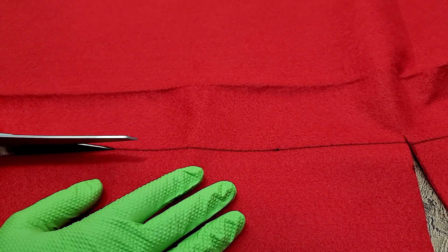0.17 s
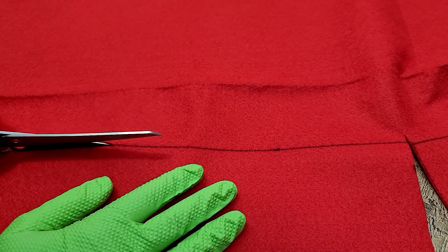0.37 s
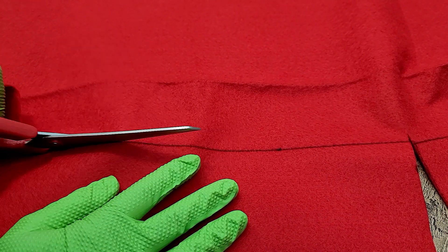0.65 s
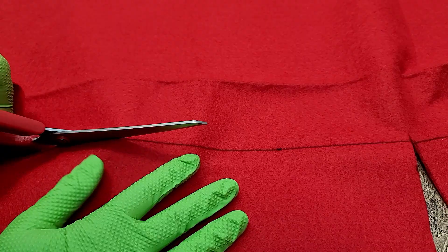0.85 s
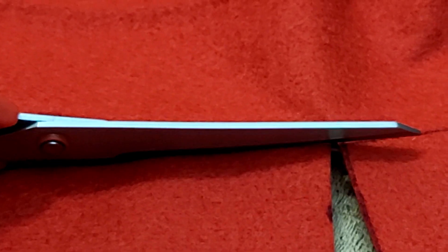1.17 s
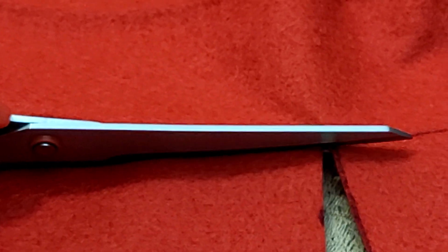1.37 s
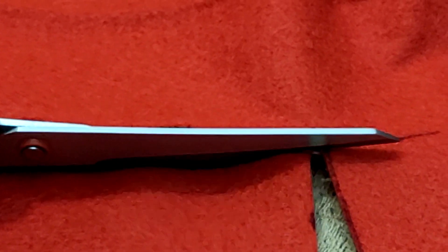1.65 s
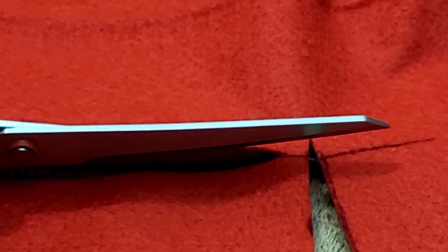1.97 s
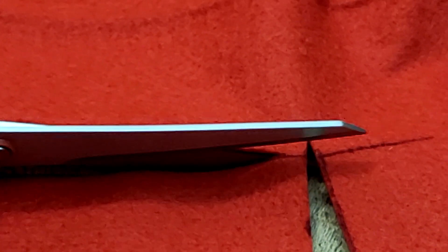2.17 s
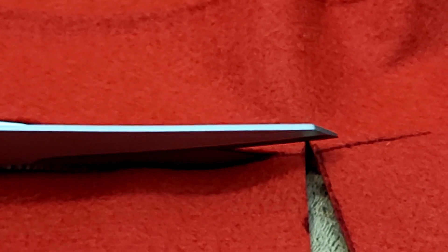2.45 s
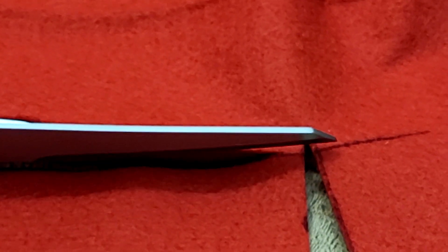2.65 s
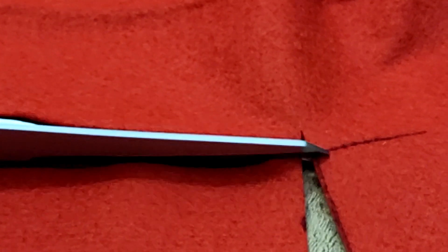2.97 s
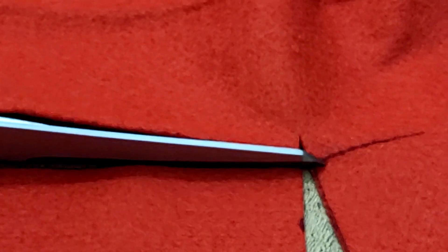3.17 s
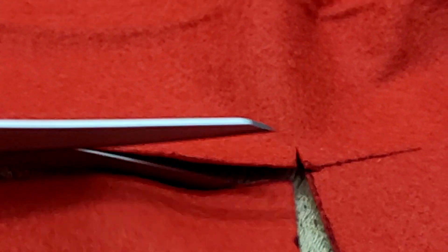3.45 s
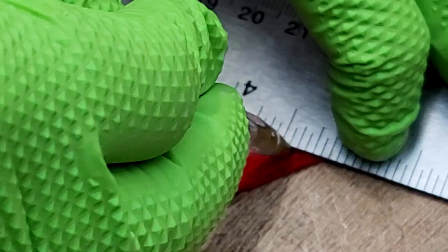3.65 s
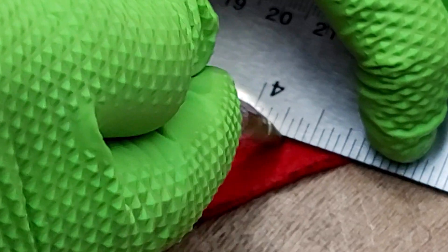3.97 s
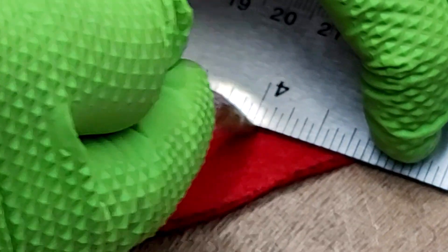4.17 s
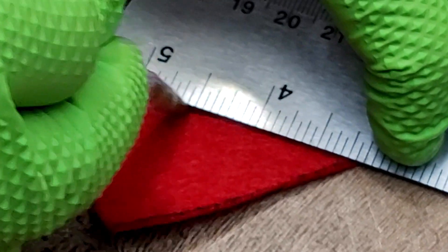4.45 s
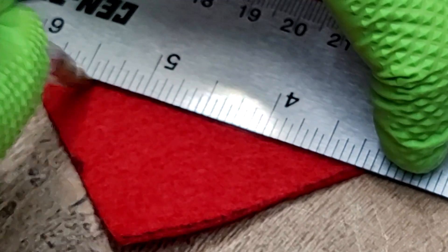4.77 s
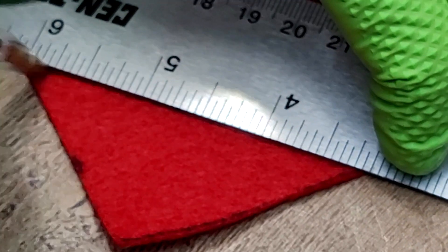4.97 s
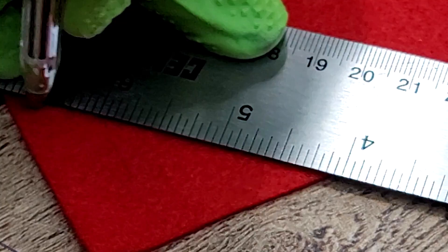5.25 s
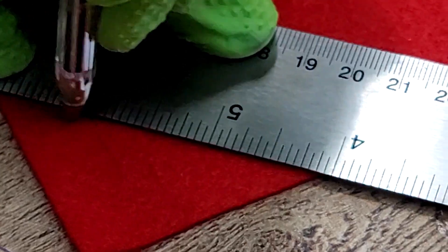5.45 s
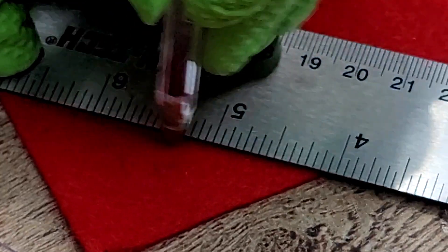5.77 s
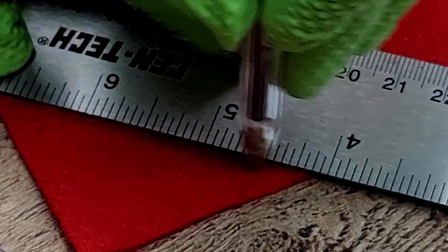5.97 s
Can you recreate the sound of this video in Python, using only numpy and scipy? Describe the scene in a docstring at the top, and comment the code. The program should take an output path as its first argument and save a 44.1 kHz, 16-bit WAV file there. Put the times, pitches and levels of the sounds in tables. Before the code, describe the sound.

Sparse fabric crunches build to a sharp metallic scissor snap in a reverberant workshop, followed by light pen scrapes and a knock on a metal ruler.

```python
"""Over a faint hiss, long shears slide forward under felt on a workbench: filtered noise judders, the blade bumps.
Fibres crunch in bursts of tiny breaks over a soft rustle and hiss, the tips snap shut with a ring, and the
blades release and rasp open again as cut felt slides off. Then a pen is set against a steel ruler, scratches
a line of friction noise and small catches, skims lightly, knocks down on the ruler and draws a second line.
Resonant filters give each part its material; early echoes and a ringing workshop surround the work."""
import sys
import numpy as np
from scipy import signal
from scipy.fft import rfft, irfft
from scipy.io import wavfile
from scipy.ndimage import uniform_filter1d

SR = 44100
rng = np.random.default_rng(int(sys.argv[2]) if len(sys.argv) > 2 else 0)


def file_out(sig):
    """Save sig as 16-bit WAV at sys.argv[1]."""
    # one column per channel
    cols = np.atleast_2d(sig).T
    # limit, then scale
    lim = np.clip(cols, -1, 1)
    pcm = np.round(lim * 32767).astype(np.int16)
    wavfile.write(sys.argv[1], SR, pcm)


N = 269892
TIME = np.arange(N) / SR  # seconds
SIZE = 2 ** 14  # samples in a short sound or a filter response
FREQ = np.fft.rfftfreq(SIZE, 1 / SR)  # Hz
LEAD = SR // 40  # samples of grazing before a blow lands


def amp(db):
    """Turn decibels into gain."""
    return 10 ** (np.asarray(db) / 20)


def at(points, hz):
    """Read a table of (Hz, value) on a log-frequency axis."""
    f, value = np.transpose(points)
    return np.interp(np.log(np.maximum(hz, 1)), np.log(f), value)


def butter(x, hz, kind, order=2):
    """Plain high-pass or low-pass filter."""
    sos = signal.butter(order, min(hz, SR / 2 - 1), kind, fs=SR, output="sos")
    return signal.sosfilt(sos, x + 1e-18)


def body(broad, modes=(), broad_db=0):
    """How an object answers a tap: resonances standing on a broad colour, scaled to unit energy."""
    power = amp(at(broad, FREQ) + broad_db) ** 2
    for hz, width, db in modes:
        detune = (FREQ - hz) / (width / 2)
        power = power + amp(db) ** 2 / (1 + detune ** 2) / (1 + (detune / 6) ** 2)
    # fold the cepstrum so that the response starts at once and never rings before the tap
    cepstrum = irfft(np.log(power) / 2)
    cepstrum[1:SIZE // 2] *= 2
    cepstrum[SIZE // 2 + 1:] = 0
    response = irfft(np.exp(rfft(cepstrum)))
    return response / np.linalg.norm(response)


def through(x, response):
    """Let a force ring a body."""
    return signal.fftconvolve(x, response)[:N]


def add(track, s, sound):
    """Mix a short sound in at s seconds."""
    start = int(s * SR)
    track[start:start + len(sound)] += sound[:N - start]


def split(rows, s):
    """The events before and after a moment."""
    before = [row for row in rows if row[0] < s]
    after = [row for row in rows if row[0] >= s]
    return before, after


def walk(rate):
    """Smooth chance that changes about rate times a second; spread near 1."""
    step = int(SR / rate)
    held = np.repeat(rng.standard_normal(N // step + 1), step)[:N]
    return 1.2 * uniform_filter1d(held, step)


def grains(rate, spread_db):
    """Tiny slips and fibre breaks of very unequal size, over a smooth hiss; rms near 1."""
    chance = rng.random(N) < rate / SR
    size_db = spread_db * np.minimum(rng.exponential(size=N), 4)
    slips = chance * rng.standard_normal(N) * amp(size_db)
    hiss = rng.standard_normal(N) / 2
    return (slips / np.std(slips) + hiss) / np.sqrt(1 + 1 / 4)


def stroke(start, hardest, end, db, easing_db):
    """Pressure of one stroke: it sets in, swells to its hardest moment, eases off and lifts."""
    attack_s, release_s = .008, .025
    gate = np.clip(np.minimum((TIME - start) / attack_s, (end - TIME) / release_s), 0, 1)
    easing = np.interp(TIME, [start, hardest, end], [1, 0, 1])
    return gate * amp(db - easing_db * easing)


def rubbing(pressure, rate, spread_db, uneven_db):
    """Stick-slip friction that follows the wavering pressure of a stroke."""
    return grains(rate, spread_db) * pressure * amp(uneven_db * walk(60))


def travelling(force, lag_s, share, rate):
    """Bending waves return from the end of the steel after a wandering lag and cancel part of the sound."""
    lag = lag_s * np.exp(walk(rate) / 2)
    returned = np.interp(TIME - lag, TIME, force)
    return (force - share * returned) / np.sqrt(1 + share ** 2)


def brighten(force, treble_db):
    """A harder contact holds more treble."""
    dull = butter(force, 2000, "low", order=1)
    return dull + amp(treble_db) * (force - dull)


def crunches(rows, rate, spread_db, treble_db):
    """Each row is a burst of tiny breaks or slips that swells quickly and trails off in a faint tail."""
    tail_db, tail_fade_s = -17.5, .018
    force, fine, t = np.zeros(N), grains(rate, spread_db), TIME[:SIZE]
    for s, db, length in rows:
        progress = np.minimum(t / length, 1)
        tail = amp(tail_db) * progress * np.exp(-np.maximum(t - length, 0) / tail_fade_s)
        swell = np.sin(np.pi * progress ** .65) + tail
        burst = swell * fine[int(s * SR):][:SIZE]
        # even out the chance differences in energy
        burst *= np.linalg.norm(swell) / np.linalg.norm(burst)
        add(force, s, amp(db) * brighten(burst, treble_db))
    return force


def blow(db, treble_db, rattle, click, graze_s):
    """The surfaces graze, meet in one sharp push LEAD samples in and rattle to rest."""
    t = TIME[:SIZE] - TIME[LEAD]
    graze = np.exp(-np.abs(t) / graze_s) / 2
    shape = np.where(t < 0, graze, np.exp(-np.abs(t) / rattle))
    push = rng.standard_normal(SIZE) * shape
    push[LEAD] = click
    return amp(db) * brighten(push, treble_db)


def blows(rows, click, graze_s):
    """The force of a series of blows, each landing at its own moment."""
    force = np.zeros(N)
    for s, *strength in rows:
        add(force, s - TIME[LEAD], blow(*strength, click, graze_s))
    return force


def air_hiss():
    """A faint, steady hiss: random noise given a broad colour."""
    # Each row: frequency in Hz, level in dB.
    colour = [(100, -30), (250, -12), (400, -1), (650, 0), (1400, -4), (2500, -11), (4300, -20),
              (6000, -13), (7600, -6), (8400, -9), (9300, -28), (13000, -23), (16000, -20)]
    return amp(-69.5) * through(rng.standard_normal(N), body(colour))


def advance():
    """The lower blade judders over the grain of the bench as it is pushed under the felt."""
    # Each row: start, hardest moment and end in seconds, level in dB, easing towards the ends in dB.
    pushes = [(0, .45, .55, -45, 9), (.42, .55, .635, -45.5, 3), (.595, .62, .84, -51, 11)]
    # The blade's one clear bending resonance and the bench below.
    # Each row: frequency and width in Hz, level in dB.
    resonances = [(400, 60, -20), (1050, 70, -16), (1385, 75, 0), (1530, 110, -7), (1720, 110, -12)]
    # Broad colour, muffled by the felt above. Each row: frequency in Hz, level in dB.
    colour = [(150, -70), (350, -31), (850, -24), (1450, -15), (1850, -20), (2200, -38), (5000, -45),
              (15900, -60)]
    pressure = np.max([stroke(*row) for row in pushes], axis=0)
    return through(rubbing(pressure, rate=4000, spread_db=1, uneven_db=1), body(colour, resonances))


def bench():
    """The lower blade bumps the bench and skids on it; the felt pads both, so they have little click."""
    # Bumps. Each row: moment in seconds, level in dB, treble in dB, rattle in seconds.
    bumps = [(.979, -37.5, -2, .018), (.999, -36.5, 3, .0058), (1.847, -32.5, -16, .007),
             (2.077, -48, -6, .004), (2.548, -52, -8, .008), (2.574, -41.5, -8, .01)]
    # One dull rub: start, hardest moment and end in seconds, level (before a trim) and easing in dB.
    skid_stroke = (1.822, 1.862, 1.965, -39, 9)
    # Bench resonances. Each row: frequency and width in Hz, level in dB.
    resonances = [(359.6, 49, -4), (672, 24, -2.5), (1150, 100, -9.5), (1440, 36, -6), (2000, 390, -15),
                  (3990, 42, -35.5)]
    # Broad colour, before a shift. Each row: frequency in Hz, level in dB.
    colour = [(150, -63), (250, -39.5), (379, -6), (747, -10.5), (987, -19.5), (1450, -9.5), (1720, -35),
              (1980, -14), (2480, -34.5), (9280, -38), (15900, -49.5)]
    skid = rubbing(stroke(*skid_stroke), rate=3000, spread_db=1, uneven_db=1.2)
    dull_skid = butter(skid, 800, "low", order=1)
    force = blows(bumps, click=5, graze_s=.003) + amp(1.5) * dull_skid
    return through(force, body(colour, resonances, broad_db=-4))


def rustle_and_hiss():
    """A soft rustle of felt and a background hiss around 7 kHz lie under the shear work."""
    # One long swell: start, loudest moment and end in seconds, level and easing in dB.
    swell = (.98, 2.2, 3.85, -67.5, 1)
    # The rustle below, the hiss around 7 kHz. Each row: frequency in Hz, level in dB.
    colour = [(120, -83), (200, -52.5), (373, 3.5), (448, -18), (670, -1), (966, -9), (1060, -7),
              (1450, -4), (4670, -26), (7240, -7.5), (8230, -14.5), (9190, -57), (15900, -22)]
    return through(rubbing(stroke(*swell), rate=6000, spread_db=1.5, uneven_db=3.5), body(colour))


def tip_crunch(row):
    """One short crunch near the tips, dense and even: the harder, the brighter."""
    middling_db, treble_per_db, corner_hz = -27, .6, 3800
    force = crunches([row], rate=7000, spread_db=1.2, treble_db=-0.5)
    # filter forwards and backwards, so that the dull part stays in step
    backwards = butter(force, corner_hz, "low")[::-1]
    dull = butter(backwards, corner_hz, "low")[::-1]
    return dull + amp(treble_per_db * (row[1] - middling_db)) * (force - dull)


def blade_crunches():
    """Bites near the pivot, then near the tips, which ring differently; last, the blades release."""
    # Bites, and last, after the snap, two short crunches as the blades release and start to open.
    # Each row: start in seconds, level in dB, length in seconds.
    rows = [(1.201, -49, .009), (1.245, -34, .021), (1.260, -31.5, .026), (1.361, -28, .009),
            (1.376, -35, .018), (1.426, -35, .0075), (2.747, -47.5, .028), (2.778, -42, .024),
            (2.801, -40, .028), (2.819, -30.5, .036), (2.869, -29.5, .024), (2.892, -34.5, .03),
            (3.070, -38, .012), (3.0772, -19.5, .017), (3.105, -26, .008), (3.308, -37, .02),
            (3.320, -25, .024)]
    # Blade resonances near the pivot and near the tips. Each row: frequency and width in Hz, level in dB.
    heel_resonances = [(702, 82, -3), (1090, 34, -4), (1490, 98, -7), (2026, 135, 2), (2500, 51, -14),
                       (2590, 44, -8.5), (3170, 18, -25), (3330, 78, -26), (3670, 90, -19)]
    tip_resonances = [(590, 130, -1), (1007, 84, -4), (1480, 110, 3), (1920, 80, 3.5), (2660, 130, -3),
                      (3860, 140, -17.5), (5600, 47, -26.5), (5700, 35, -22.5), (7200, 120, -25),
                      (7300, 75, -25)]
    # Broad colours, before a shift, then what the crunches throw into the room, where narrow
    # resonances blur. Each row: frequency in Hz, level in dB.
    heel_colour = [(150, -79), (250, -45), (354, -11.5), (673, -19), (905, -11), (1450, -4.5), (1750, -14),
                   (2050, -9), (2750, -13.5), (3700, -16.5), (4970, -38.5), (7940, -31), (15900, -38)]
    tip_colour = [(150, -45), (250, -15), (617, -2), (1150, -13.5), (1910, -7), (2660, -10), (3270, -19.5),
                  (3630, -13), (4170, -31), (4800, -21.5), (9120, -35.5), (11000, -30.5), (15900, -26.5)]
    room_colour = [(150, -50), (380, -5), (520, -7), (700, -1), (950, -5), (1400, 0), (2050, -1),
                   (2700, -6), (4500, -22), (7500, -23), (15900, -29)]
    heel_rows, tip_rows = split(rows, 2.5)
    heel_force = crunches(heel_rows, rate=2500, spread_db=3.0, treble_db=0)
    tip_force = sum(tip_crunch(row) for row in tip_rows)
    heel = through(heel_force, body(heel_colour, heel_resonances, broad_db=-2))
    tips = through(tip_force, body(tip_colour, tip_resonances, broad_db=-1.5))
    return heel + tips, through(heel_force + tip_force, body(room_colour))


def blade_slide():
    """The blades slide along in one short rub that rings their steel."""
    # One rub: start, hardest moment and end in seconds, level and easing in dB.
    slide = (2.157, 2.255, 2.335, -48.5, 1)
    # Each row: frequency and width in Hz, level in dB.
    resonances = [(377, 26, -6.5), (847, 61, -11.5), (1420, 60, 0.5), (1930, 100, 0), (2660, 110, -5),
                  (3620, 43, -15)]
    # Broad colour, before a shift. Each row: frequency in Hz, level in dB.
    colour = [(150, -77), (250, -30), (366, -15.5), (1000, -15), (1450, -7), (1660, -18), (1980, -14.5),
              (7940, -35.5), (9280, -48.5), (15900, -36.5)]
    force = rubbing(stroke(*slide), rate=2300, spread_db=1.0, uneven_db=0.8)
    return through(force, body(colour, resonances, broad_db=-2))


def after_ring(start_s):
    """The snap leaves tones ringing that waver and beat against their neighbours, so the tail throbs."""
    # Each row: frequency in Hz, level in dB before the overall level, time to fade by 60 dB in seconds.
    ringing = [(420, -7, .55), (476, -1, .5), (508, -2, .45), (565, -9, .5), (724, -2, .5), (1081, -9, .55),
               (1397, -7, .55), (1610, -5, .6), (1781, -9, .6), (2384, -11, .55), (2665, -11, .5)]
    level_db, build_s, wavers_per_s = -27.5, .015, 35
    out, t, tones = np.zeros(N), TIME[:SR], 0
    for hz, db, t60 in ringing:
        wavering = (walk(wavers_per_s) + 1j * walk(wavers_per_s))[:SR]
        tone = np.real(wavering * np.exp(2j * np.pi * hz * t))
        tones = tones + amp(db - 60 * t / t60) * tone
    add(out, start_s, amp(level_db) * tones * np.minimum(t / build_s, 1))
    return out


def snap_shut():
    """The tips snap shut: two sharp blows ring the closed blades and throw a burst into the room."""
    # Each row: moment in seconds, level in dB, treble in dB, rattle in seconds.
    snaps = [(3.1134, -4.3, -1, 0.0038), (3.1150, -12.5, -2.5, 0.005)]
    # Closed blades. Each row: frequency and width in Hz, level in dB.
    resonances = [(482, 66, -9), (688, 24, -6), (1345, 130, 1), (1910, 12, -8.5), (2048, 43, -2.5),
                  (2440, 9, -1.5), (2652, 50, -2), (3700, 220, -13.5), (4300, 78, -19), (6000, 190, -20),
                  (7400, 39, -20.5), (8040, 200, -24.5)]
    # Their broad colour, before a shift, and that of the burst. Each row: frequency in Hz, level in dB.
    colour = [(150, -49), (250, -25), (451, -2), (1110, -16), (1450, -2.5), (2050, -6.5), (2230, -18),
              (2610, -1.5), (3110, -12.5), (3830, -19.5), (15900, -30.5)]
    room_colour = [(150, -40), (380, -12), (480, 2), (620, -11), (720, 2), (850, -10), (1080, 1), (1500, 0),
                   (2200, -6), (2600, -3.5), (3200, -12), (4500, -17), (7500, -20), (10000, -29),
                   (15900, -30)]
    first_s = snaps[0][0]
    snap = through(blows(snaps, click=9, graze_s=0.0053), body(colour, resonances, broad_db=-3))
    spill = np.zeros(N)
    add(spill, first_s, amp(15.5) * body(room_colour))
    return snap + after_ring(first_s), spill


def blade_opening():
    """The opening blades rub edge on edge and rasp."""
    # One rub: start, hardest moment and end in seconds, level and easing in dB.
    rasp = (3.322, 3.345, 3.48, -32, 8)
    # Each row: frequency and width in Hz, level in dB.
    resonances = [(565, 22, 5), (672, 60, 2), (1020, 42, -5), (1430, 45, 4), (1890, 130, -2),
                  (2600, 130, -9), (2870, 25, -14), (3610, 60, -12), (5300, 200, -24), (7470, 90, -26)]
    # Broad colour. Each row: frequency in Hz, level in dB.
    colour = [(150, -70), (250, -38), (354, -13), (750, -11), (1350, -8), (2000, -11), (2280, -22),
              (2660, -16), (3100, -25), (3700, -20), (4500, -29), (5600, -26), (15900, -38)]
    force = rubbing(stroke(*rasp), rate=2500, spread_db=2, uneven_db=1.2)
    return through(force, body(colour, resonances, broad_db=0))


def shears():
    """Crunching and rubbing, with waves returning along the blades; also gives the part sent to the room."""
    crunching, spill = blade_crunches()
    rubs = blade_slide() + blade_opening()
    return travelling(crunching + rubs, lag_s=.0008, share=0.3, rate=25), spill + rubs


def felt_slips():
    """Cut felt slides off the opening blades, fastest as they come to a stop; a last wisp follows."""
    # Each row: start, hardest moment and end in seconds, level and easing in dB.
    slips = [(3.32, 3.445, 3.48, -51, 11), (3.47, 3.60, 3.625, -60, 4)]
    # Each row: frequency in Hz, level in dB.
    colour = [(300, -4), (2500, -2), (5500, 4.5), (8500, 4.5), (10000, -3), (15000, 6.5)]
    pressure = sum(stroke(*row) for row in slips)
    return through(rubbing(pressure, rate=6600, spread_db=3, uneven_db=2.5), body(colour))


def pen_set_down():
    """The pen is set against the ruler: two light blows ring its body."""
    # Each row: moment in seconds, level in dB, treble in dB, rattle in seconds.
    touches = [(3.7385, -39.5, 0, .003), (3.748, -46, -14, .003)]
    # Each row: frequency and width in Hz, level in dB.
    resonances = [(689, 60, 1), (1385, 50, 0), (1810, 60, -13), (3225, 80, -6.5), (7208, 120, -24)]
    # Broad colour. Each row: frequency in Hz, level in dB.
    colour = [(150, -60), (400, -20), (1400, -19), (2500, -25), (3300, -22), (4500, -33), (8000, -32),
              (15900, -42)]
    return through(blows(touches, click=7, graze_s=.001), body(colour, resonances))


def light_catches(pressure, treble_db):
    """Small snags at uneven intervals while the pen moves, stronger the harder it is pressed."""
    per_s, below_stroke_db, scatter_db = 16, -5, 2.5
    chance = rng.random((200, 2))
    times = (np.arange(len(chance)) + chance[:, 0]) / per_s
    pressed = np.interp(times, TIME, pressure, right=0)
    scatter = scatter_db * (2 * chance[:, 1] - 1)
    rows = []
    for s, p, db in zip(times, pressed, scatter):
        if p > 0:
            rows.append((s, 20 * np.log10(p) + below_stroke_db + db, treble_db))
    return rows


def catching(rows, broad, modes, broad_db, rattle_s, click, graze_s):
    """Each catch meets the ruler at another place, which favours other resonances."""
    colour_db, detune_share = 4.5, .015  # scatter of level and of pitch
    out = np.zeros(N)
    for s, db, treble_db in rows:
        chance = np.clip(rng.standard_normal((len(modes), 2)), -1.5, 1.5)
        here = []
        for (hz, width, level), (a, b) in zip(modes, chance):
            here.append((hz * (1 + detune_share * a), width, level + colour_db * b))
        force = blow(db, treble_db, rattle_s, click, graze_s)
        add(out, s - TIME[LEAD], signal.fftconvolve(force, body(broad, here, broad_db)))
    return out


def pen_lines():
    """The pen scrapes two lines along the ruler; catches ring the steel more clearly than the scraping."""
    # Two lines. Each row: start, hardest moment and end in seconds, level (before a trim) and easing in dB.
    strokes = [(4.14, 4.62, 4.93, -54.5, 8), (5.42, 5.83, 6.15, -51, 14)]
    # The pen catching on the ruler's edge. Each row: moment in seconds, level in dB, treble in dB.
    catches = [(4.085, -56, -5), (4.152, -46, -11), (4.186, -45, -4), (4.236, -53, -8), (4.305, -43.5, -1),
               (4.352, -43, -9), (4.364, -49, -9), (4.399, -49, -2), (4.479, -49, -4), (4.512, -52, -4),
               (4.547, -49, 2), (4.565, -43, 1), (4.583, -50, -3), (4.600, -44.5, -4), (4.616, -41.5, -2),
               (4.697, -49, -1), (4.796, -40, -3), (4.825, -49, -5), (5.393, -38, -8), (5.449, -35, -7),
               (5.560, -36, -2), (5.700, -50, 0), (5.719, -47, 4), (5.781, -37, -12), (5.800, -41, -4),
               (5.812, -37, -2), (5.845, -41, -8), (5.862, -45, -6), (5.884, -45, -8), (5.906, -48, -8),
               (5.966, -42, -2), (5.982, -37, -2)]
    # Resonances far from and near the microphone. Each row: frequency and width in Hz, level in dB.
    far_resonances = [(440, 35, 0), (665, 70, -1), (990, 60, -6), (1230, 70, -6), (1455, 90, -4),
                      (2352, 60, -6), (2752, 40, -4), (3006, 45, 0), (3240, 130, 5), (3624, 40, -4),
                      (6400, 200, -10), (8200, 400, -8), (10120, 250, -11)]
    near_resonances = [(432, 32, -7.5), (1110, 70, -11), (1240, 70, -11), (1400, 70, -14), (1880, 79, -11),
                       (2430, 18, -12), (2750, 31, -11), (3110, 70, -11), (3600, 160, -16),
                       (5550, 110, -22.5), (7500, 57, -20), (8050, 400, -18), (10380, 300, -28)]
    # Broad colours, before any shift. Each row: frequency in Hz, level in dB.
    far_colour = [(150, -60), (300, -24), (420, -9), (700, -11), (830, -20), (1000, -11), (2100, -12),
                  (3300, -9), (4400, -27), (5000, -13), (8100, -12), (9300, -29), (10100, -22),
                  (15900, -28)]
    near_colour = [(150, -81), (250, -62), (348, -28), (428, 0), (546, -16), (905, -16.5), (1190, -4),
                   (1660, -16), (1880, -10.5), (2050, -23.5), (3110, -10.5), (4800, -29), (8080, -28),
                   (9610, -38), (15900, -35)]
    far, near = (stroke(*row) for row in strokes)
    all_catches = catches + light_catches(far + near, treble_db=-5)
    far_rows, near_rows = split(all_catches, 5.35)
    far_catches = catching(far_rows, far_colour, far_resonances, broad_db=-2,
                           rattle_s=.0055, click=7, graze_s=.004)
    near_catches = catching(near_rows, near_colour, near_resonances, broad_db=-5,
                            rattle_s=.0075, click=3, graze_s=.0045)
    far_force = rubbing(amp(-3.5) * far, rate=1400, spread_db=2.2, uneven_db=3)
    near_force = rubbing(amp(-2.5) * near, rate=700, spread_db=2.2, uneven_db=3.5)
    first = through(far_force, body(far_colour, far_resonances, broad_db=2))
    second = through(near_force, body(near_colour, near_resonances))
    scraping = travelling(first + second, lag_s=.0011, share=.6, rate=9)
    return scraping + far_catches + near_catches


def pen_skims():
    """The pen's tip skims lightly at the end of one line and before the next, a bright scratch."""
    # Each row: start in seconds, level in dB, length in seconds.
    skims = [(4.953, -55, .038), (4.999, -58, .035), (5.304, -53, .022), (5.326, -50, .014)]
    # Each row: frequency in Hz, level in dB.
    colour = [(300, -12), (1200, -4), (2400, -10), (4300, -12), (5800, 1), (15900, -4)]
    return through(crunches(skims, rate=3000, spread_db=2, treble_db=0), body(colour))


def pen_knock():
    """The pen comes down on the ruler: two blows with a strong click ring the steel."""
    # Each row: moment in seconds, level in dB, treble in dB, rattle in seconds.
    knocks = [(5.0788, -16.7, 1, 0.0044), (5.0835, -28.5, -3, 0.011)]
    # Each row: frequency and width in Hz, level in dB.
    resonances = [(428, 38, 2.5), (695, 50, -3), (1107, 107, 4), (1260, 100, -2.5), (1664, 70, -7.5),
                  (2100, 66, -5), (2390, 150, -7.5), (2550, 71, -12), (3230, 210, -17), (5350, 280, -24),
                  (6870, 170, -21.5)]
    # Broad colour, before a shift. Each row: frequency in Hz, level in dB.
    colour = [(150, -58), (250, -44), (393, -4), (829, -12), (1040, 4.5), (1580, -8), (2350, -4),
              (2850, -27), (3220, -7.5), (4250, -25.5), (5320, -19.5), (9950, -29), (15900, -25)]
    return through(blows(knocks, click=17.2, graze_s=0.0038), body(colour, resonances, broad_db=-4.5))


def reflect(x):
    """The bench top and the things around it send back distinct early echoes."""
    # Each row: delay in seconds, level in dB.
    echoes = [(.0047, -18), (.0105, -18), (.0395, -23)]
    return x + sum(amp(db) * np.interp(TIME - s, TIME, x, left=0) for s, db in echoes)


def workshop(x, delay_s=0.0083, build_s=0.019, side_db=-10):
    """Diffuse reverberation: noise that sets in late, builds up and dies away band by band."""
    # Each row: frequency in Hz, time to fade by 60 dB in seconds.
    decay = [(300, .65), (700, .74), (1500, .7), (3000, .58), (7000, .52), (15000, .3)]
    # How much of the sound reverberates. Each row: frequency in Hz, level in dB.
    room_share = [(250, -8), (500, -2), (1400, -6), (2600, -7), (4000, -6.5), (7500, -6), (10000, -10),
                  (16000, -12)]
    t, hz = TIME[:SR], np.fft.rfftfreq(SR, 1 / SR)
    noise = rfft(rng.standard_normal((2, SR)))
    edges = np.geomspace(100, SR / 2, num=17)
    build = np.clip((t - delay_s) / build_s, 0, 1)
    tail = 0
    for lo, hi in zip(edges[:-1], edges[1:]):
        fade = np.exp(-np.log(1000) * t / at(decay, np.sqrt(lo * hi))) * build
        band = irfft(noise * (hz >= lo) * (hz < hi) * amp(at(room_share, hz)))
        tail = tail + band * fade / np.linalg.norm(fade)
    mid = through(x, tail[0])
    side = amp(side_db) * butter(through(x, tail[1]), 4200, "low")
    return np.array([mid + side, mid - side])


def scene():
    """All the work happens straight in front of the microphone, over a faint hiss, with the room around it."""
    air, pushing, bumps = air_hiss(), advance(), bench()
    blades, blades_spill = shears()
    snap, snap_spill = snap_shut()
    soft = rustle_and_hiss() + felt_slips()
    drawing = pen_set_down() + pen_lines() + pen_skims()
    knock = pen_knock()
    # how much of each source reaches the room
    to_room = amp(-5.5) * (blades_spill + pushing) + snap_spill + amp(-4.5) * bumps
    to_room = to_room + amp(-7.5) * knock + amp(-5.5) * drawing + soft
    direct = pushing + blades + snap + bumps + drawing + knock
    return reflect(direct) + soft + air + workshop(to_room)


def record(dry):
    """The microphone cuts the bass steeply, overloads on the snap and loses the very top."""
    thin = np.clip(butter(dry, 315, "high", order=10), -1, 1)
    # lopsided overload turns the loudest hit into a low thump as well
    bent = thin + amp(-19) * thin ** 6
    top = signal.firwin(255, 15900, fs=SR)  # low-pass, Hz
    return signal.fftconvolve(bent, top[None], mode="same", axes=1)


dry = scene()
out = record(dry)
file_out(out)
```